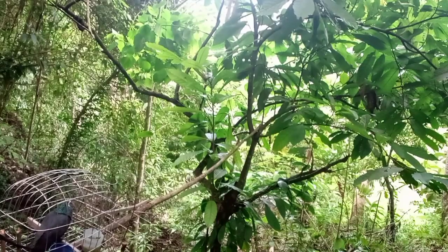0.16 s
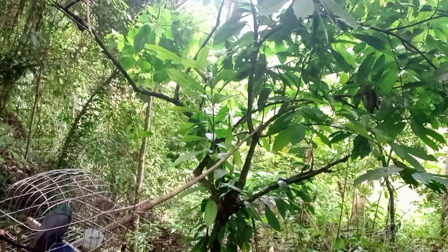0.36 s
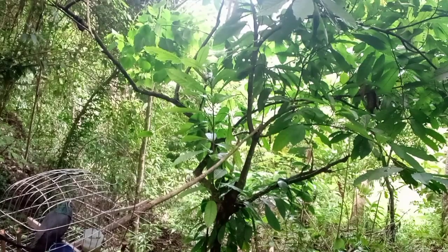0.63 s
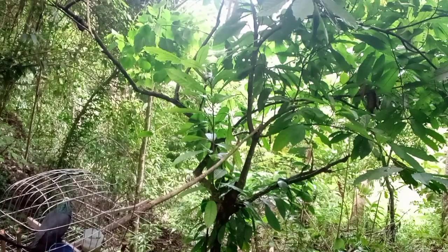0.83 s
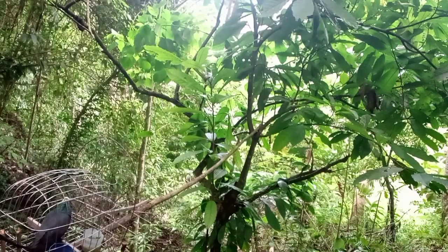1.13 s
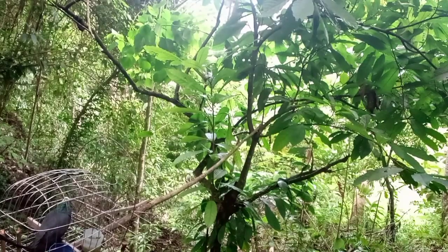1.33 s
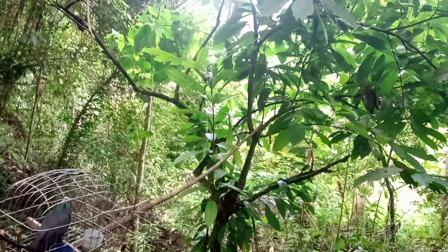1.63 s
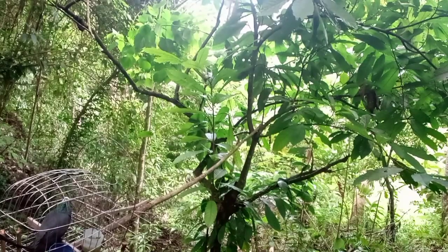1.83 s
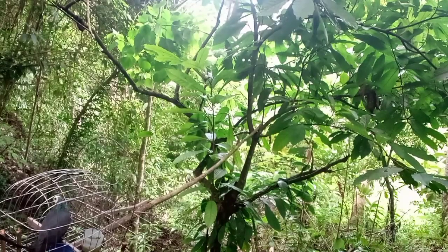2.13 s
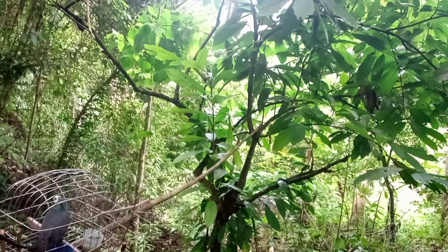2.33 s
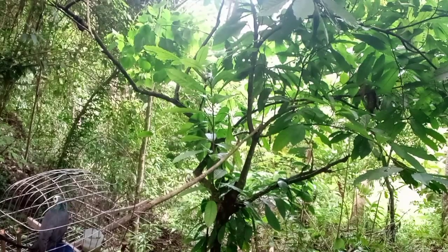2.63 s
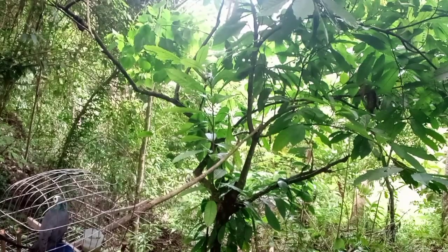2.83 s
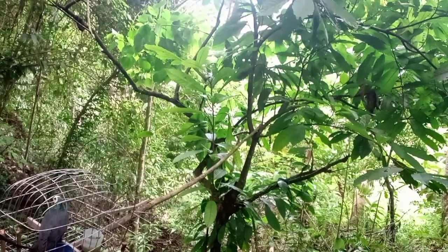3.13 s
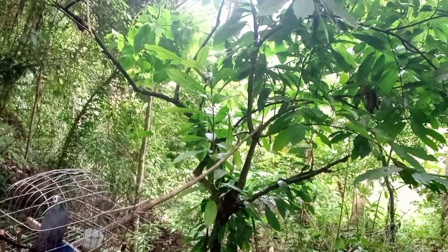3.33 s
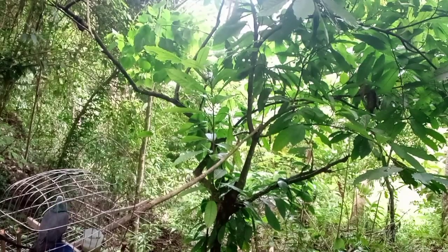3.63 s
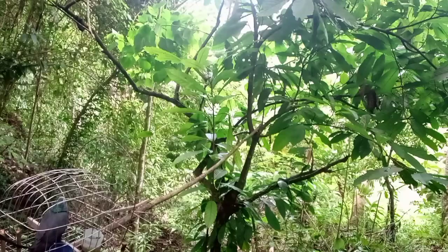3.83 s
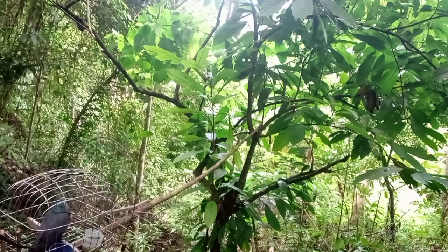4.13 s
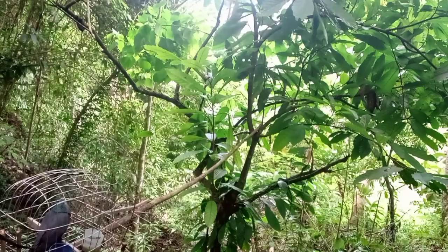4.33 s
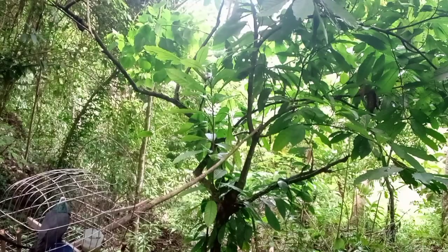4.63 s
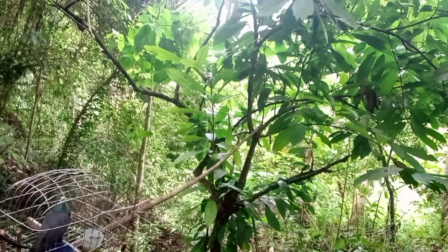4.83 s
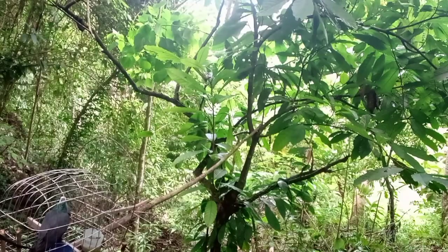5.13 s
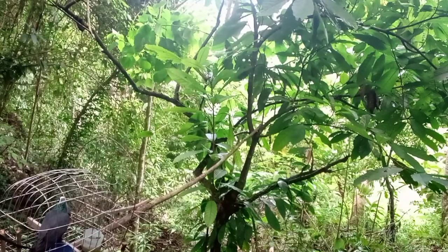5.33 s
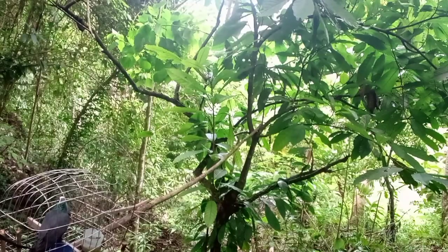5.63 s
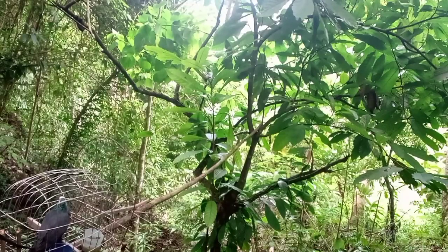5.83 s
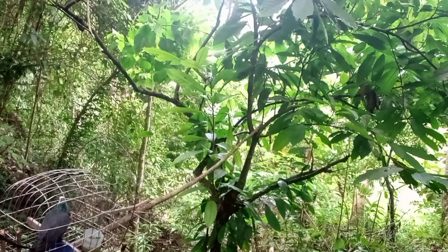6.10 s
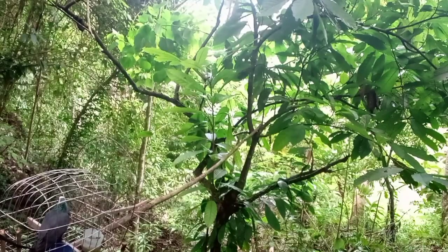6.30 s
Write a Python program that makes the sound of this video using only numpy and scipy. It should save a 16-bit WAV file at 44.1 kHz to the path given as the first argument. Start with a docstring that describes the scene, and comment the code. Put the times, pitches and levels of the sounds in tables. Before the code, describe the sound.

In a tropical forest, a wild pigeon gives one short, pure coo. A cricket close to the microphone starts chirping, high and rapid, in three runs, while twigs and leaves tick faintly. Around four seconds the pigeon gives a short coo and a long throaty one, then two softer, higher notes near the end. Distant insect trills, a very high katydid buzz and a soft rumble continue throughout.

```python
"""A tropical forest: a soft rumble, far insects that trill and swell, and a very high katydid buzz throughout.
A wild pigeon opens with one short, almost pure coo. A near cricket starts scraping its wings, nine falling
chirps a second in three runs, while twigs and leaves tick now and then. Near 4 s the pigeon gives a short
coo and a long one, throaty where a second vibration beats against the note, and closes with a soft puff.
Two higher notes follow after 6 s."""
import sys
import numpy as np
from scipy import signal
from scipy.fft import rfft, irfft
from scipy.io import wavfile

SR = 44100
rng = np.random.default_rng(int(sys.argv[2]) if len(sys.argv) > 2 else 0)


def transcribe(u):
    """Save the signal u as a 16-bit wav file named by the first command-line argument.

    u: samples, shape (n,) or (channels, n), limited to [-1, 1]; the rate is SR.
    q: integer samples, one column per channel.
    """
    v = np.clip(np.atleast_2d(u).T, -1, 1)
    q = np.round(v * 32767).astype(np.int16)
    wavfile.write(sys.argv[1], SR, q)


N = 284886
TIME = np.arange(N) / SR


def from_db(db):
    """Decibels to gain."""
    return 10 ** (np.asarray(db) / 20)


def rms_one(x):
    """Scale to rms 1."""
    return x / np.sqrt(np.mean(x ** 2) + 1e-20)


def ramp(t, start, length):
    """Rises from zero at start to one after the given length."""
    return np.clip((t - start) / length, 0, 1)


def gate(t, start, end, edge):
    """One between start and end, with fades outside."""
    return np.clip(np.minimum(t - start, end - t) / edge + 1, 0, 1)


def phase_of(hz):
    """Running phase of a steady or gliding pitch."""
    return 2 * np.pi * np.cumsum(hz * np.ones(N)) / SR


def drift(rate_hz, order=2):
    """Smooth random modulation up to the given rate; rms 1."""
    lowpass = signal.butter(order, rate_hz, fs=SR, output="sos")
    return rms_one(signal.sosfilt(lowpass, rng.standard_normal(N + SR))[SR:])


def coloured(spectrum):
    """Noise shaped by an EQ curve; rms 1."""
    hz, db = np.transpose(spectrum)
    gain = from_db(np.interp(np.log(np.fft.rfftfreq(N, 1 / SR) + 1), np.log(hz), db))
    return rms_one(irfft(rfft(rng.standard_normal(N)) * gain, N))


def blurred_tone(hz, width_hz, order=2):
    """A band of noise, like many unrelated voices around one pitch; rms 1."""
    phase = phase_of(hz)
    return drift(width_hz / 2, order) * np.cos(phase) + drift(width_hz / 2, order) * np.sin(phase)


def forest_reverb(x, t60_s, build_s=0.0046):
    """Countless leaves and trunks scatter a diffuse, dying tail."""
    t = TIME[:SR]
    tail = rng.standard_normal(SR) * from_db(-60 * t / t60_s) * (1 - np.exp(-t / build_s))
    return signal.fftconvolve(x, tail / np.linalg.norm(tail))[:N]


def forest_air(level_db=-61.5):
    """A steady bed of distant rumble and leaf hiss."""
    # (frequency [Hz], relative level [dB])
    spectrum = [(25, -30), (50, -9), (85, 0.5), (130, -1), (250, -5.5), (500, -10), (1000, -15.5),
                (2000, -19), (3000, -20.5), (3700, -23.5), (4750, -23), (6500, -17), (8200, -26.5),
                (9500, -28.5), (16000, -24.5)]
    return from_db(level_db) * coloured(spectrum)


def far_insects(whistle_width_hz=25, swell_shape=0.66):
    """Throbbing trills blurred by distance, lone whistles, and choruses that swell as their pitch rises."""
    # far crickets: (pitch [Hz], width [Hz], level [dB], throb rate [Hz], throb depth [dB])
    trills = [(7032, 26, -71.5, 36, 5), (7060, 244, -68.5, 32, -0.5), (6920, 97, -72, 18, 2.5),
              (5880, 84, -70.5, 15, 2.5), (5815, 700, -66.5, 57, 3)]
    # single voices that stand out of the chorus: (start [s], end [s], pitch [Hz], level [dB])
    whistles = [(1.843, 2.698, 4165, -73.5), (3.597, 4.899, 3910, -81.5), (5.652, 6.2, 4285, -75.5)]
    # choruses: (start [s], end [s], centre [Hz], rise [Hz], width [Hz], peak level [dB])
    swells = [(0.2, 1.175, 4060, 330.5, 496, -68.5), (1.201, 1.903, 4020, 120, 350, -74),
              (1.698, 3.05, 4020, 59.5, 507, -68.5), (2.647, 3.652, 4115, 101, 500, -69),
              (3.697, 4.65, 3990, 79, 500, -74), (4.8, 6.3, 4080, 199, 520, -67.2),
              (3.4, 4.2, 8140, 80, 600, -81), (4.26, 4.36, 7950, 3, 250, -76),
              (5.65, 6.6, 8150, 80.5, 600, -80), (5.6, 6.6, 2950, 100, 600, -80)]
    out = 0
    for hz, width_hz, level_db, throb_hz, depth_db in trills:
        throb = np.sin(phase_of(throb_hz * (1 + 0.014 * drift(2.2))))
        out += from_db(level_db + depth_db * throb) * blurred_tone(hz, width_hz, order=3)
    for start, end, hz, level_db in whistles:
        out += from_db(level_db) * gate(TIME, start, end, 0.11) * blurred_tone(hz, whistle_width_hz)
    for start, end, hz, rise_hz, width_hz, level_db in swells:
        progress = ramp(TIME, start, end - start)
        swell = np.abs(np.sin(np.pi * progress)) ** swell_shape
        out += from_db(level_db) * swell * blurred_tone(hz + rise_hz * (progress - .5), width_hz, order=5)
    return out


def far_katydids(level_db=-68, surge_db=6.5, surge_at_s=4.39, surge_s=0.1):
    """Distant katydids merge into an even hiss with one brief surge."""
    # (frequency [Hz], relative level [dB])
    spectrum = [(10500, -35), (12000, -14), (13600, -14), (14400, 0), (15300, 0), (15700, -4),
                (16000, -8.5)]
    surge = np.exp(-((TIME - surge_at_s) / surge_s) ** 2)
    return from_db(level_db + surge_db * surge) * coloured(spectrum)


def twigs(crackle_db=3):
    """Small dry snaps of twigs and leaves, each a crackle that dies quickly."""
    # (time [s], level [dB], centre [Hz], width [Hz], time to fall 30 dB [s])
    ticks = [(0.49, -63, 1400, 1200, 0.036), (0.926, -69, 3150, 1100, 0.082), (1.378, -66, 3200, 700, .04),
             (1.535, -69, 3200, 1200, .04), (1.703, -67, 2990, 500, 0.055),
             (2.95, -65.5, 2720, 1205, 0.044), (3.081, -63, 1710, 1985, 0.11),
             (5.916, -64, 3160, 1300, 0.049)]
    out = 0
    for start, level_db, hz, width_hz, decay_s in ticks:
        envelope = (TIME >= start) * from_db(level_db - 30 * np.clip(TIME - start, 0, 1) / decay_s)
        out += envelope * blurred_tone(hz, width_hz, order=3)
    return out * from_db(crackle_db * drift(300))


def katydid(level_db=-64.5, stroke_hz=55.26, stroke_share=0.11, uneven_db=2.0, swell_db=0.1):
    """A near katydid: fast wing strokes, each a short burst of very high rasp."""
    # (frequency [Hz], relative level [dB])
    spectrum = [(8000, -53), (11000, -29), (12000, -14), (13600, -17.5), (14200, -5.5), (14700, 2.5),
                (15600, -0.5), (16000, -8)]
    cycle = (phase_of(stroke_hz * (1 + 0.0031 * drift(1.1))) / (2 * np.pi)) % 1
    bursts = np.exp(-((cycle - .5) / stroke_share) ** 2)
    flicker = from_db(uneven_db * drift(180) + swell_db * drift(9.7))
    return from_db(level_db) * rms_one(bursts * flicker * coloured(spectrum))


def wing_strokes(wing_hz=6266, flat_hz=32.01, warm_strokes=1.6, scatter_hz=9, pace_spread=0.025):
    """Age and top pitch of the cricket's current stroke; each run starts flat and hurries slightly."""
    # runs of strokes: (start [s], strokes [count], period [s], shortening of the period per stroke [s])
    runs = [(0.259, 12, 0.10593, 0.00022), (1.6139, 23, 0.107, 0.000032), (4.2075, 22, 0.10691, 0.000042)]
    strokes = [(first + k * (period - hurry * k / 2), wing_hz - flat_hz * np.exp(-k / warm_strokes))
               for first, count, period, hurry in runs for k in range(count)]
    starts, top_hz = np.transpose(strokes)
    chance = rng.standard_normal((len(starts), 2))
    pace = 1 + pace_spread * chance[:, 0]
    top_hz = top_hz + scatter_hz * chance[:, 1]
    current = np.maximum(np.searchsorted(starts, TIME + .001) - 1, 0)   # 1 ms early, for the attack
    return (TIME - starts[current]) * pace[current], top_hz[current]


def cricket(level_db=-38.0, stroke_s=0.037, crest_s=0.009, release_s=0.006, scoop_hz=259.7, fall_hz=880,
            grip_s=0.025, skip_s=0.0286, tooth_db=0.5, slip_db=1.0, slip_jitter=0.0095, wet_db=-23):
    """Each stroke draws file across scraper: the tone scoops up, falls as the wing slows, then skips."""
    age, top_hz = wing_strokes()
    scoop = np.exp(-np.maximum(age, 0) / 0.002)
    fall = ramp(age, crest_s, stroke_s - crest_s) ** 1.8
    flat_hz = scoop_hz * scoop + fall_hz * fall
    detune_db = 0.015 * flat_hz   # weaker away from the pitch at which the wing rings
    dropout_db = 12 * np.exp(-((age - skip_s) / 0.0024) ** 2)   # the scraper skips
    slipping = gate(age, grip_s, 1, 0.0037)
    grit_db = (tooth_db + slip_db * slipping) * drift(540)
    contact = gate(age, 0, 1, 0.0011) * (1 - ramp(age, stroke_s - release_s, release_s))
    envelope = from_db(level_db - detune_db - dropout_db + grit_db) * contact
    hz = (top_hz - flat_hz) * (1 + slip_jitter * slipping * drift(402))
    song = envelope * np.sin(phase_of(hz))
    return song + from_db(wet_db) * forest_reverb(song, t60_s=0.45)


def coo_gesture(note, level_curve, release_s=0.03, drop_hz=135, drop_db=7):
    """Pitch and level of one note: the pitch arches over a crest, then drops as the sound dies."""
    start, end, crest, crest_hz, rise_hz, sag_hz, _ = note
    below_crest = (1 + np.cos(np.pi * ramp(TIME, start, crest - start))) / 2
    sag = ramp(TIME, crest, end - crest) ** 2
    release = ramp(TIME, end - release_s, release_s) ** 2
    hz = crest_hz - rise_hz * below_crest - sag_hz * sag * (1 - release) - drop_hz * release
    level_db = np.interp(TIME, *np.transpose(level_curve)) - drop_db * release
    return hz, level_db


def purr_contour(start, end, onset_db=14, settle_s=0.022, fade_db=20, fade_s=0.091, patch_db=2.5):
    """The purr's rise and fall in dB: strong as a note starts, patchy, gone before the note ends."""
    onset = np.exp(-np.maximum(TIME - start, 0) / settle_s)
    fade = ramp(TIME, end - fade_s, fade_s)
    return onset_db * onset - fade_db * fade + patch_db * drift(18)


def coo(note, level_curve, octave_db=-36.5, purr_hz=576, wander_hz=29, rasp_db=5.0, flutter_db=0.8):
    """A near sine; a second, unsteady vibration beats against it and makes the throaty purr."""
    start, end, *_, throat_db = note
    hz, level_db = coo_gesture(note, level_curve)
    purr_db = throat_db + purr_contour(start, end)
    jitter = 0.004 + 0.013 * from_db(np.minimum(purr_db, 0))   # the purr also shakes the note itself
    phase = phase_of(hz * (1 + jitter * drift(97, order=4)))
    tone = np.sin(phase) + from_db(octave_db) * np.sin(2 * phase)
    purr_phase = phase_of(purr_hz + wander_hz * np.tanh(drift(87, order=4)))
    purr = np.sin(purr_phase) * from_db(purr_db + rasp_db * np.tanh(drift(43, order=4)))
    envelope = from_db(level_db + flutter_db * drift(65)) * gate(TIME, start, end, 0.0019)
    return np.sqrt(2) * envelope * (tone + purr) / np.hypot(1, from_db(purr_db))   # equal-power blend


def pigeon(puff_hz=520, puff_width_hz=240, puff_s=0.029, wet_db=-18):
    """Coos and closing puffs, returned by the nearest trees and by the forest."""
    # one row per note; the long coo is two notes run together:
    # (start [s], end [s], crest [s], crest pitch [Hz], rise [Hz], sag [Hz], base purr re the tone [dB])
    notes = [(0.0, 0.112, 0.02, 484, 2, 12, -23), (3.771, 3.852, 3.79, 494, 4.2, 16, -12),
             (4.012, 4.27, 4.165, 498, 48, 74, -6), (4.259, 4.568, 4.385, 486, 62, 11, -16),
             (6.108, 6.162, 6.127, 743, 150, 10, -25.5), (6.402, 6.6, 6.55, 790, 285, 0, -16)]
    # loudness of each coo as heard, with its swells and dips: (time [s], level [dB])
    note_levels = [
        [(0.0, -50), (0.046, -38), (0.07, -38), (0.115, -48)],
        [(3.768, -53), (3.778, -46), (3.8, -41), (3.818, -48), (3.838, -43), (3.85, -53)],
        [(4.014, -50), (4.038, -38), (4.146, -41), (4.176, -36), (4.208, -44), (4.224, -40), (4.275, -45)],
        [(4.262, -47), (4.324, -36), (4.358, -41), (4.392, -38), (4.452, -46), (4.492, -38), (4.542, -43),
         (4.568, -49)],
        [(6.108, -58), (6.114, -55), (6.162, -65)],
        [(6.402, -63), (6.44, -48), (6.46, -50)],
    ]
    # soft puffs that close a phrase: (time [s], level [dB])
    puffs = [(0.195, -70), (0.222, -65.5), (4.652, -60.5)]
    # slapback from a nearby bank of trees: (delay [s], gain [dB])
    echoes = [(.068, -14.5)]
    coos = sum(coo(note, level_curve) for note, level_curve in zip(notes, note_levels))
    puff_envelope = sum(from_db(db) * np.exp(-((TIME - at) / puff_s) ** 2) for at, db in puffs)
    voice = coos + puff_envelope * blurred_tone(puff_hz, puff_width_hz, order=3)
    slapback = sum(from_db(db) * np.interp(TIME - delay, TIME, voice, left=0) for delay, db in echoes)
    return voice + slapback + from_db(wet_db) * forest_reverb(voice, t60_s=0.9)


def scene():
    """Bird, insects and twigs over the forest air, in mono."""
    return (forest_air() + pigeon() + cricket() + far_insects() + katydid() + far_katydids() + twigs())[None]


def record(dry, dip_hz=4743, dip_width_hz=1230, dip_db=-11, cutoff_hz=15800):
    """The microphone has one dip in the treble; the top is cut steeply."""
    dip_band = signal.lfilter(*signal.iirpeak(dip_hz, dip_hz / dip_width_hz, fs=SR), dry)
    dipped = dry - (1 - from_db(dip_db)) * dip_band
    return signal.sosfilt(signal.ellip(12, .1, 70, cutoff_hz, fs=SR, output="sos"), dipped)


dry = scene()
out = record(dry)
transcribe(out)
```